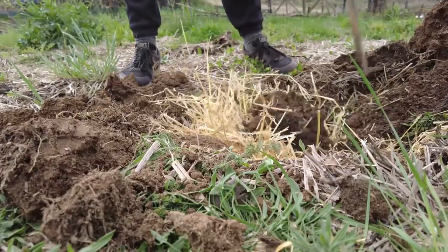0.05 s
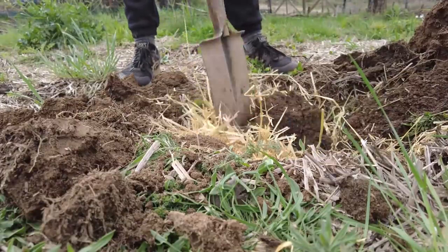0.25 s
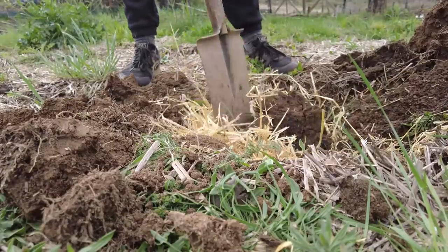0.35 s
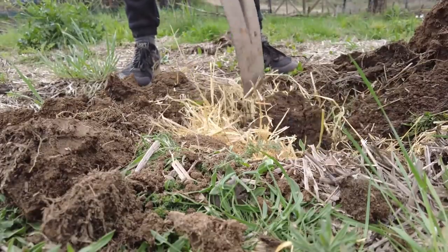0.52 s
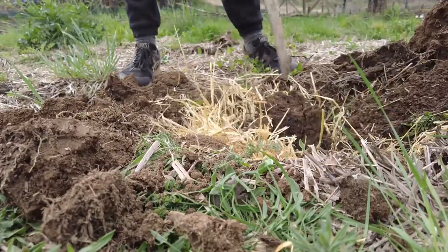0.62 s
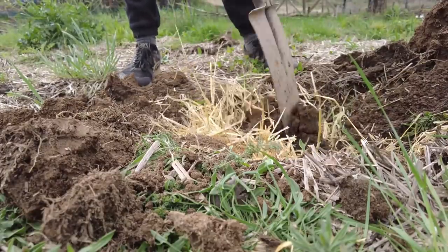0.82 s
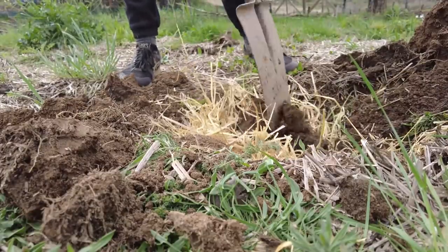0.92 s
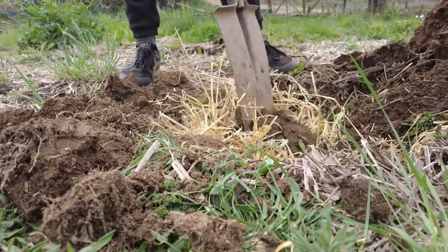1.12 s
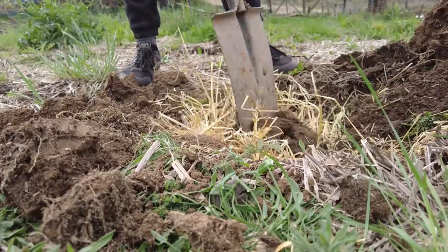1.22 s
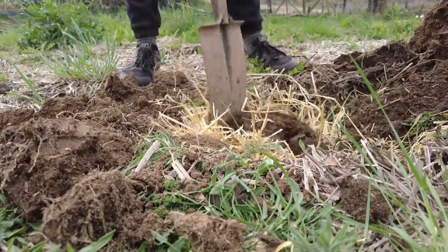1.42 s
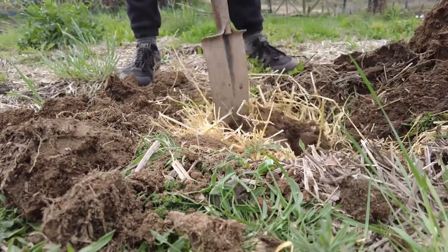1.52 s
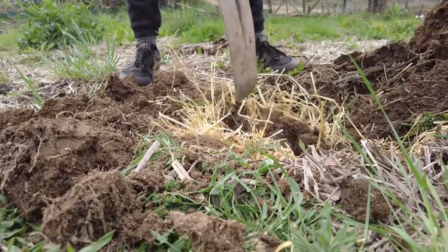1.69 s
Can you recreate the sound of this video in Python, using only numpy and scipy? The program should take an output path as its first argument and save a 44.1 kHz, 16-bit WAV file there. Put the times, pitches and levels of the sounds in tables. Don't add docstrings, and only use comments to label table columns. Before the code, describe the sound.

Close stereo pickup of digging in a garden: three short spade strokes with pebbles clinking on the blade, soil crunching and straw rustling, the first with the heaviest thud, soft gusty wind beneath, no room echo.

```python
import sys
import numpy as np
from scipy import signal
from scipy.fft import rfft, irfft, next_fast_len
from scipy.io import wavfile
from scipy.ndimage import uniform_filter1d, map_coordinates

SR = 44100
rng = np.random.default_rng(int(sys.argv[2]) if len(sys.argv) > 2 else 0)


def decibels_to_gain(level_db):
    exponent = np.asarray(level_db, float) / 20
    return 10 ** exponent


def materialize(psi):
    bounded = np.clip(np.atleast_2d(psi).T, -1, 1)
    quanta = np.round(bounded * 32767).astype(np.int16)
    wavfile.write(sys.argv[1], SR, quanta)


N = 77175


def unit(x):
    return x / np.sqrt(np.mean(x ** 2) + 1e-20)


def seconds(length_s):
    return np.arange(int(length_s * SR)) / SR


def along(points, hz):
    f, v = np.transpose(points)
    return np.interp(np.log(hz + 1), np.log(f + 1), v)


def timeline(points):
    return np.interp(np.arange(N) / SR, *np.transpose(points))


def wobble(size, rate):
    knots = rng.standard_normal(int(size * rate / SR) + 4)
    return map_coordinates(knots, [np.arange(size) * rate / SR])


def filtered(x, response):
    m = next_fast_len(x.shape[-1] + 4096)
    hz = np.fft.rfftfreq(m, 1 / SR)
    return irfft(rfft(x, m) * response(hz), m)[..., :x.shape[-1]]


def grains(size, per_s, spread_db):
    clumps = wobble(size, per_s)
    return unit(rng.standard_normal((2, size)) * decibels_to_gain(spread_db * clumps))


def stereo(pair, spectrum, alike):
    def mid_side(hz):
        turn = np.arccos(np.clip(along(alike, hz), -1, 1)) / 2
        return decibels_to_gain(along(spectrum, hz)) * [np.cos(turn), np.sin(turn)]

    mid, side = filtered(pair, mid_side)
    return unit(np.array([mid + side, mid - side]))


def add(track, s, x):
    part = track[round(s * SR):][:len(x)]
    part += x[:len(part)]


def focus(hz, favoured_hz, focus_db):
    return -focus_db * abs(np.log2((hz + 50) / favoured_hz))


def impact(t, contact_s):
    u = t / contact_s
    return u * np.exp(-2 * u) * rng.standard_normal(len(t))


# frequency in Hz, level in dB.
WIND_SPECTRUM = [(12, -44), (20, -5.5), (71, -5.5), (113, -12), (209, -14), (306, -15), (545, -24),
                 (1500, -38), (1950, -56), (3300, -120)]
# time in seconds, wind level in dB.
GUST_LEVELS = [(0, 4), (.1, 3), (.2, 3.5), (.37, 6), (.5, 3), (.7, 6), (1.0, 1.5), (1.3, 6), (1.55, 6.5),
               (1.75, 6.5)]
# frequency in Hz, level in dB.
HISS_SPECTRUM = [(600, -43), (1000, -4.5), (1500, 3), (2500, -8), (6000, -9.5), (11000, -36), (14000, -18),
                 (15700, -11.5)]
# frequency in Hz, left-right likeness from 0 to 1.
HISS_LIKENESS = [(1000, 0.32), (12000, 0.13)]
# frequency in Hz, left-right likeness from 0 to 1.
LIKENESS = [(30, 0.92), (130, 0.99), (400, 0.5), (1000, 0.16), (4000, 0.98), (12000, 0.59)]
WIND_DB, GUST_DB, HISS_DB = -63, 0.5, -72


def air():
    gust_db = timeline(GUST_LEVELS) + GUST_DB * wobble(N, 15.26)
    wind = stereo(rng.standard_normal((2, N)), WIND_SPECTRUM, LIKENESS)
    hiss = stereo(rng.standard_normal((2, N)), HISS_SPECTRUM, HISS_LIKENESS)
    return decibels_to_gain(WIND_DB + gust_db) * wind + decibels_to_gain(HISS_DB) * hiss


# time in seconds, level in dB.
RUSTLE_LEVELS = [(0, -65), (.04, -61.5), (.19, -70), (0.252, -47), (.37, -63), (0.481, -66), (.505, -58.5),
                 (.55, -75), (.79, -79.5), (.9, -68), (1.07, -63), (1.21, -60.5), (1.24, -71.5),
                 (1.37, -74), (1.55, -66), (1.645, -68), (1.665, -62), (1.73, -69.5)]
# frequency in Hz, level in dB.
STRAW_SPECTRUM = [(600, -3), (1100, -9.5), (1400, -9), (3900, -6.5), (9500, -11.5), (13500, -12),
                  (15800, -6.5)]
STRAW_DB, STRAW_PER_S, STRAW_SPREAD_DB = 2.5, 430, 1.5


def rustle():
    spectrum = [(300, -54)] + STRAW_SPECTRUM + [(17000, -14)]
    straw = stereo(grains(N, STRAW_PER_S, STRAW_SPREAD_DB), spectrum, LIKENESS)
    return decibels_to_gain(timeline(RUSTLE_LEVELS) + STRAW_DB) * straw


# start in seconds, peak level in dB, frequency in Hz, swell time in seconds,
# pitch gain in Hz per second as the soil packs.
GROUND_THUDS = [(.251, -21.5, 34, .012, 400), (.248, -31, 125, .011, 0), (.256, -43, 260, .006, 0),
                (.305, -46, 66, .012, 0), (.812, -43, 55, .007, 0), (.255, -40, 215, .008, 0),
                (.266, -46, 970, .004, 0), (.84, -53, 660, .008, 0), (.814, -44, 140, .005, 0),
                (.812, -46, 290, .01, 0), (1.455, -39, 31, .018, 0), (1.432, -48, 200, .008, 0),
                (.845, -48, 560, .006, 0), (.264, -44, 700, .004, 0), (.826, -48, 360, .007, 0),
                (1.393, -42, 900, .004, 0), (1.393, -40, 610, .005, 0)]
# frequency in Hz, left over right in dB.
THUD_BALANCE = [(40, 2), (90, 2), (130, -1)]
CRUMBLE_DB, CRUMBLE_HZ = -23, 204


def thuds():
    out, t = np.zeros((2, N)), seconds(1 / 4)
    for s, db, hz, swell_s, gain_hz in GROUND_THUDS:
        swell = np.exp(-(t / swell_s - 2) ** 2 / 2) * np.clip(2 * t / swell_s, 0, 1)
        noise = rng.standard_normal(len(t))
        crumble = unit(filtered(noise, lambda f: decibels_to_gain(-9 * np.log2((f + 1) / CRUMBLE_HZ) ** 2)))
        tone = np.sin(2 * np.pi * (hz + gain_hz * t / 2) * t)
        swing = swell * (tone + decibels_to_gain(CRUMBLE_DB) * crumble)
        pan_db = along(THUD_BALANCE, hz)
        add(out[0], s, decibels_to_gain(db + pan_db / 2) * swing)
        add(out[1], s, decibels_to_gain(db - pan_db / 2) * swing)
    return out


# start in seconds, level in dB, contact time in seconds,
# favoured frequency in Hz, focus in dB per octave.
CLOD_BREAKS = [(0.252, -49, 0.0034, 4200, 0), (0.2127, -41.5, 0.0016, 7600, 30),
               (0.2562, -42, 0.0017, 6740, 8), (0.2632, -43.5, 0.002, 8150, 33),
               (.2625, -48.5, 0.0023, 2670, 12), (.270, -43, 0.0057, 1090, 9),
               (.711, -77, 0.0017, 7600, 10), (1.005, -63, .002, 1300, 7), (1.222, -59.5, .001, 1500, 8),
               (1.399, -59, 0.0022, 13300, 45), (1.478, -62, .01, 12400, 70), (1.505, -57, 0.0024, 4500, 1),
               (.805, -50, 0.0023, 2310, 14), (1.339, -56, 0.0035, 9400, 14), (1.3555, -64, .0007, 1500, 2),
               (1.484, -50, 0.0034, 2800, 7), (1.503, -51.5, 0.0027, 945, 14)]
# frequency in Hz, level in dB.
SOIL_SPECTRUM = [(150, -0.5), (450, -7.5), (1050, -12), (2500, -8.5), (6000, -8.5), (8500, -13.5),
                 (12000, -21), (16000, -16.5)]


def clods():
    out, t = np.zeros(N), seconds(1 / 10)
    for s, db, contact_s, favoured_hz, focus_db in CLOD_BREAKS:
        def colour(hz):
            return decibels_to_gain(along(SOIL_SPECTRUM, hz) + focus(hz, favoured_hz, focus_db))

        puff = filtered(impact(t, contact_s), colour)
        add(out, s, decibels_to_gain(db) * puff / np.std(puff[:SR // 100]))
    return out


# frequency in Hz, width in Hz, level in dB.
BLADE_MODES = [(524, 42, 1.5), (1320, 70, -1), (1750, 51, 0), (2370, 35, -1.5), (2702, 46, -1.5),
               (3000, 58, -0.5), (3823, 55, 0), (4000, 40, -2.5), (4187, 30, 0), (4630, 60, -10 ),
               (5583, 62, -0.5), (5850, 146, -1), (7690, 71, -2.5), (11160, 51, -13)]
MODES_HZ = np.transpose(BLADE_MODES)[0]
BURIED, BURIED_DB = 4.44, -9
GRIP_SHIFT = 1.016
SPOT_DB = 2


def blade(x, weight_db):
    def ring(f, wide):
        total = 0
        for k, (mode_hz, width_hz, db) in enumerate(BLADE_MODES):
            damping = 1j * f * width_hz * wide
            gain = (-1) ** k * decibels_to_gain(db + weight_db[k])
            total = total + gain * damping / (mode_hz ** 2 - f ** 2 + damping)
        return total

    return filtered(x, lambda f: ring(f, 0.87) + decibels_to_gain(BURIED_DB) * ring(f / GRIP_SHIFT, BURIED))


def patchy(x, depth_db):
    z = signal.stft(x, nperseg=128)[2]
    field = uniform_filter1d(rng.standard_normal(z.shape), size=3, axis=0)
    field = uniform_filter1d(field, size=8, axis=1)
    return unit(signal.istft(z * decibels_to_gain(depth_db * unit(field)), nperseg=128)[1][:len(x)])


# start in seconds, length in seconds, level in dB,
# fall over the drag in dB, tilt in dB per octave.
SOIL_DRAGS = [(0.203, 0.039, -47, 1, -1.5), (.247, 0.023, -43.5, 2.5, 1.5), (0.267, 0.098, -47, 19, -0.5),
              (0.801, 0.008, -49, 3, -0.5), (0.815, .042, -45, -1, 0), (0.861, 0.034, -45, 6.5, 2),
              (0.895, 0.14, -65, 2.5, -0.5), (1.102, 0.11, -61.5, -1.5, 0), (1.178, 0.063, -55, 2.5, -1.5),
              (1.244, .04, -66.5, 2, -0.5), (1.285, 0.029, -63.5, -3, 2.5), (1.355, .03, -66.5, 2, -1),
              (1.307, 0.043, -54, 2.5, 1), (1.388, 0.058, -51, -1.5, 0.5), (1.439, 0.079, -44.5, 5.5, 0),
              (1.517, 0.11, -67.5, 3, 1)]
ATTACK_S, RELEASE_S = 0.003, 0.018
PATCH_DB = 3.5
GRIT_PER_S, GRIT_SPREAD_DB = 900, 2
SOIL_DB = -1


def drags():
    out, t = np.zeros(N), seconds(1 / 3)
    for s, length_s, db, fall_db, tilt_db in SOIL_DRAGS:
        fall = -fall_db * np.minimum(t / length_s, 1)
        release = -20 * np.maximum(t - length_s, 0) / RELEASE_S
        stroke = np.clip(t / ATTACK_S, 0, 1) * decibels_to_gain(fall + release)
        grit, crumbs = (patchy(g, PATCH_DB) for g in grains(len(t), GRIT_PER_S, GRIT_SPREAD_DB))

        spot_db = SPOT_DB * rng.standard_normal(len(BLADE_MODES)) + tilt_db * np.log2(MODES_HZ / 3000)
        ring = blade(grit * stroke, spot_db) / np.std(blade(grit, spot_db))

        def colour(hz):
            return decibels_to_gain(along(SOIL_SPECTRUM, hz) + tilt_db * np.log2((hz + 50) / 3000))

        soil = unit(filtered(crumbs, colour))
        add(out, s, decibels_to_gain(db) * (ring + decibels_to_gain(SOIL_DB) * soil * stroke))
    return out


def evened(x):
    z = rfft(x)
    power = abs(uniform_filter1d(abs(z) ** 2, 30))
    flat = irfft(z / np.sqrt(power + 1e-12), len(x))
    return flat * (np.arange(len(x)) < len(x) // 2)


# start in seconds, level in dB, contact time in seconds,
# favoured frequency in Hz, focus in dB per octave.
PEBBLE_STRIKES = [(0.2005, -48, 0.006, 5600, 25), (0.2120, -33, 0.0014, 7750, 8),
                  (0.2130, -40, 0.0025, 4150, 24), (0.2150, -42.5, 0.007, 2860, 12),
                  (0.2584, -48.5, 0.0013, 3900, 20), (0.2724, -44, 0.0026, 1700, 16),
                  (0.8030, -44, 0.0021, 3440, 9), (0.8167, -43, 0.0013, 5700, 6),
                  (0.8163, -40, 0.0026, 2720, 17), (.8215, -45, 0.002, 1790, 12),
                  (.8300, -48, 0.0033, 7690, 20), (0.8329, -42.5, 0.0034, 1900, 10),
                  (.8345, -43.5, 0.0052, 2930, 9), (0.8465, -39, 0.005, 3800, 30),
                  (0.85, -45.5, 0.0023, 5850, 14), (.8830, -47, 0.0028, 3880, 8),
                  (0.9764, -60, 0.0013, 4000, 1), (1.0256, -61.5, 0.00088, 5000, 5),
                  (1.111, -61, 0.0061, 5000, 10), (1.1225, -61.5, 0.0027, 11000, 12),
                  (1.1552, -64, 0.0022, 6500, 5), (1.1862, -51.5, 0.004, 4500, 1),
                  (1.198, -55, 0.0078, 2440, 17), (1.3059, -46, 0.00095, 5430, 6.5),
                  (1.3360, -49, 0.0025, 5460, 11), (1.342, -61.5, .005, 2370, 25),
                  (1.386, -55, 0.0025, 5560, 8), (1.3973, -36, 0.0007, 5400, 2),
                  (1.3985, -41, .001, 2000, 7), (1.4030, -43, 0.0026, 1320, 11),
                  (1.4195, -54, .004, 7690, 25), (1.435, -50, .002, 7690, 9),
                  (1.4378, -37.5, 0.0018, 5600, 5), (1.4400, -43, 0.0039, 3500, 5),
                  (1.4425, -43.5, 0.003, 1750, 34), (1.4450, -53, 0.0011, 4100, 8),
                  (1.456, -48, 0.0091, 6050, 36), (1.592, -64, 0.0073, 1320, 32),
                  (1.6555, -69.5, 0.004, 4200, 6), (1.685, -70.5, 0.013, 3800, 22)]
CRACK_LOW_HZ = 480
CRACK_DB = -11


def strikes():
    out, t, head = np.zeros(N), seconds(1 / 8), SR // 100
    for s, db, contact_s, favoured_hz, focus_db in PEBBLE_STRIKES:
        force = evened(impact(t, contact_s))
        spot_db = SPOT_DB * rng.standard_normal(len(BLADE_MODES))
        ring = blade(force, focus(MODES_HZ, favoured_hz, focus_db) + spot_db)

        def colour(hz):
            low_cut = 1 + (CRACK_LOW_HZ / (hz + 1)) ** 4
            return decibels_to_gain(along(SOIL_SPECTRUM, hz) + focus(hz, favoured_hz, focus_db)) / low_cut

        crack = filtered(force, colour)
        both = ring / np.std(ring[:head]) + decibels_to_gain(CRACK_DB) * crack / np.std(crack[:head])
        add(out, s, decibels_to_gain(db) * both)
    return out


# frequency in Hz, level in dB.
SCATTER_SPECTRUM = [(90, -30), (250, -12.5), (600, -8.5), (1500, -14), (3500, -15), (6000, -13.5),
                    (10000, -8.5), (14000, -3.5)]
SCATTER_S = 0.015
SPADE_PAN_DB = -0.86


def scene():
    background = rustle() + air()
    ground = thuds()
    spade = clods() + drags() + strikes()
    t = seconds(1 / 20)
    scatter = rng.standard_normal(len(t)) * np.exp(-t / SCATTER_S)
    scatter = scatter / np.linalg.norm(scatter)
    echoes = signal.fftconvolve(spade + ground.mean(0), scatter)[:N]
    side = filtered(echoes, lambda hz: decibels_to_gain(along(SCATTER_SPECTRUM, hz)))
    pan = decibels_to_gain([[SPADE_PAN_DB / 2], [-SPADE_PAN_DB / 2]])
    return np.array([spade + side, spade - side]) * pan + ground + background


def low_pass(x):
    return signal.sosfilt(signal.butter(12, 16620, fs=SR, output="sos"), x)


def record(dry):
    band = filtered(dry, lambda hz: np.where(hz < 15750, 1, 0.004) * (hz > 12))
    return low_pass(band)


dry = scene()
out = record(dry)
materialize(out)
```